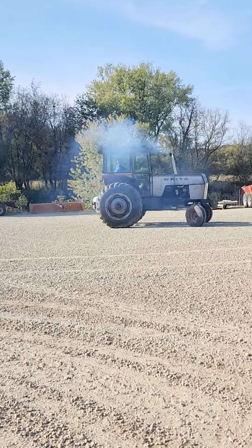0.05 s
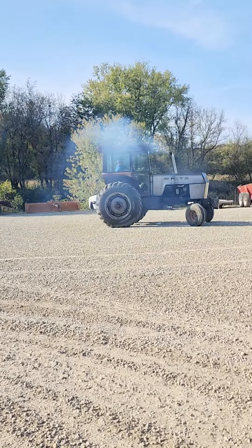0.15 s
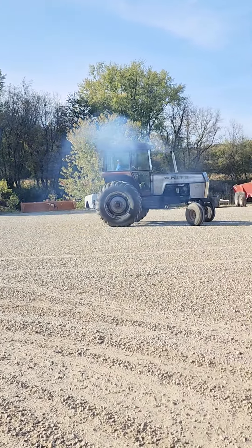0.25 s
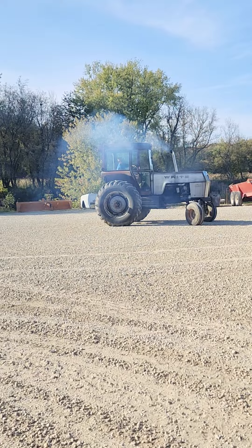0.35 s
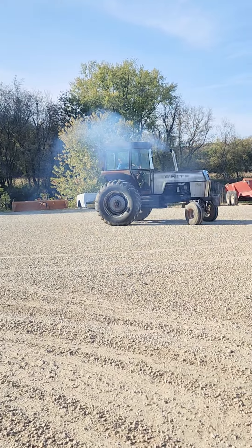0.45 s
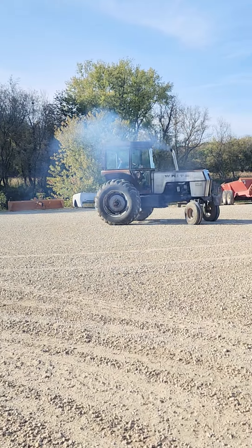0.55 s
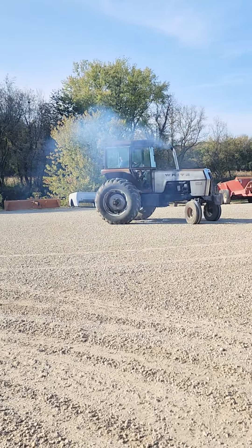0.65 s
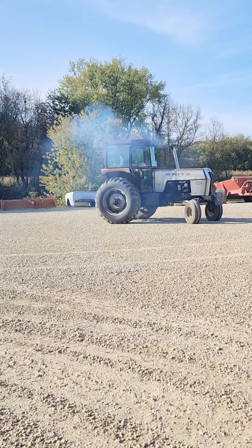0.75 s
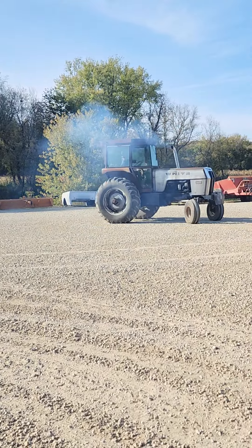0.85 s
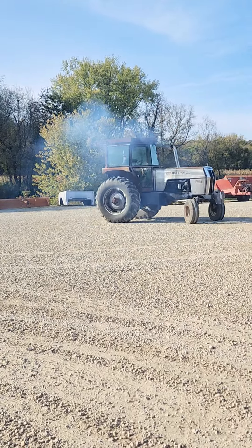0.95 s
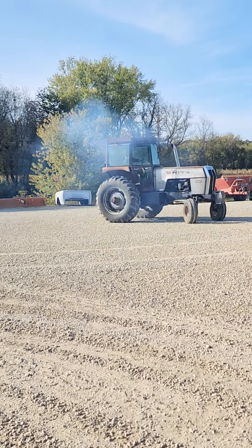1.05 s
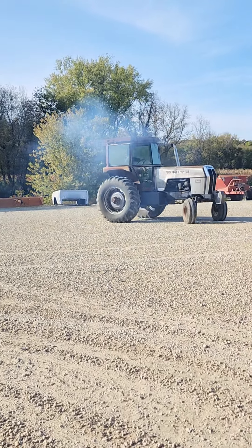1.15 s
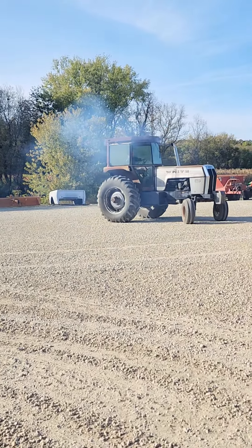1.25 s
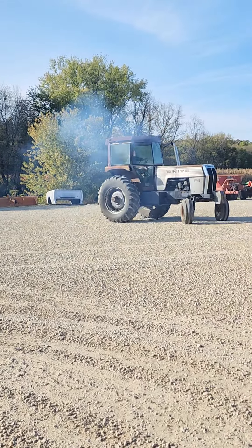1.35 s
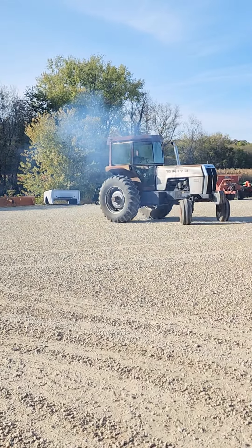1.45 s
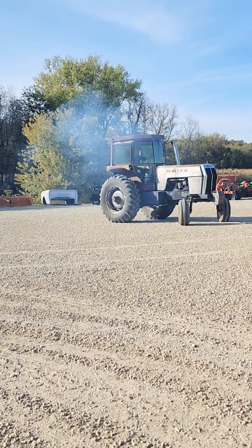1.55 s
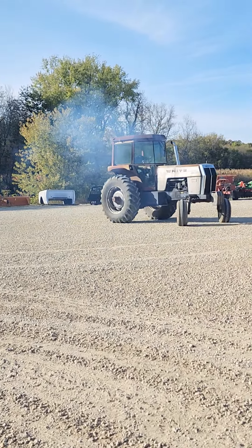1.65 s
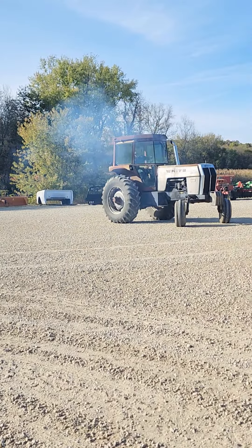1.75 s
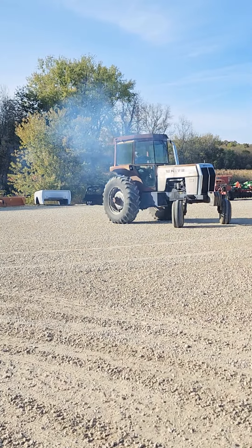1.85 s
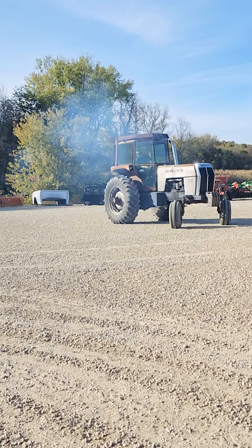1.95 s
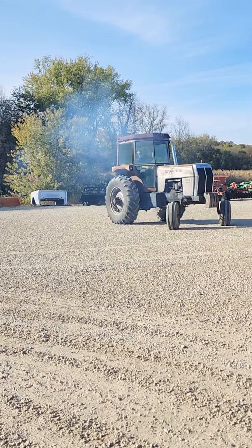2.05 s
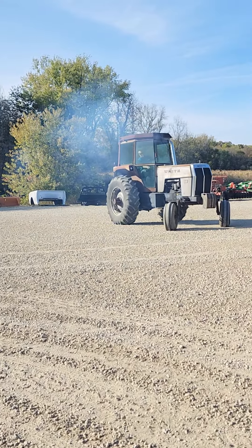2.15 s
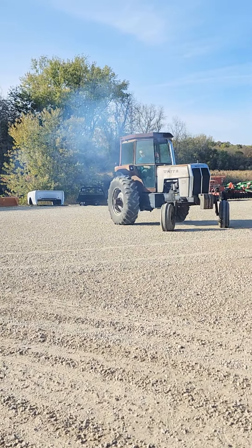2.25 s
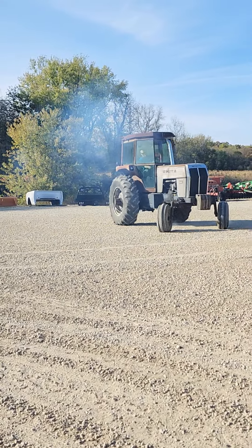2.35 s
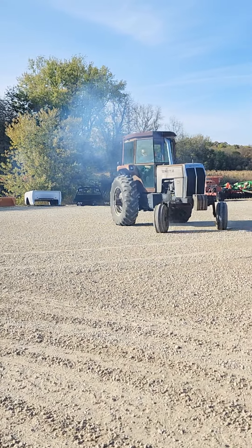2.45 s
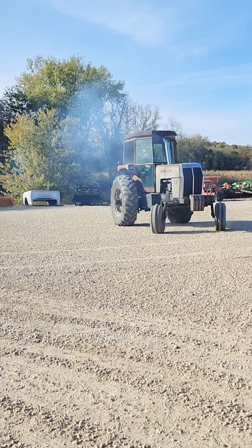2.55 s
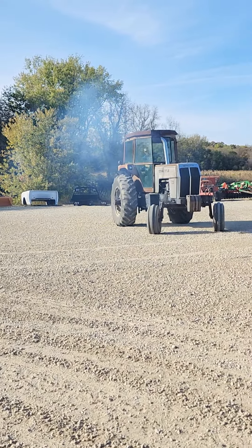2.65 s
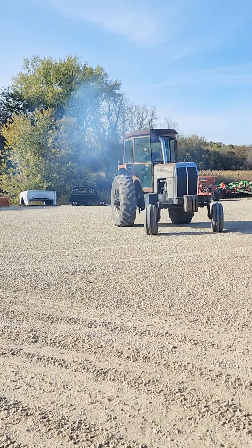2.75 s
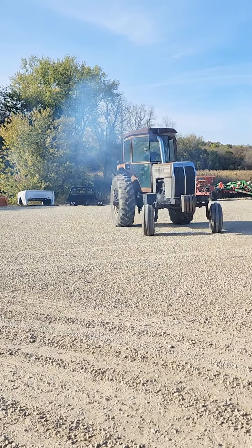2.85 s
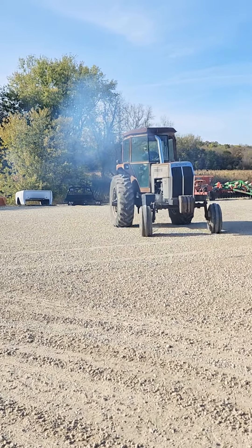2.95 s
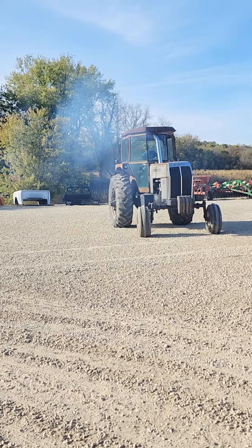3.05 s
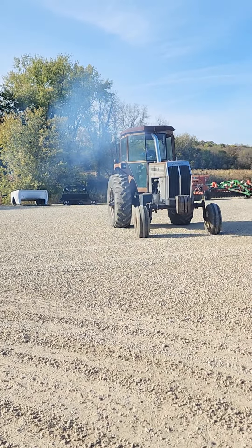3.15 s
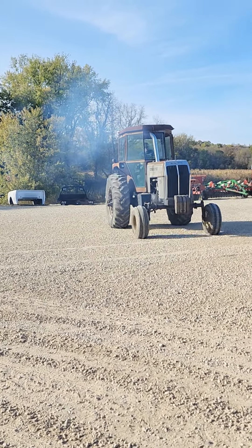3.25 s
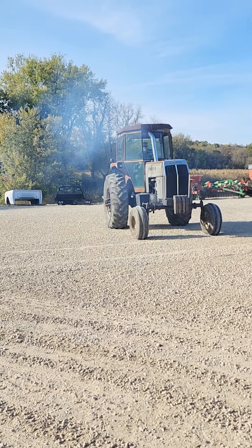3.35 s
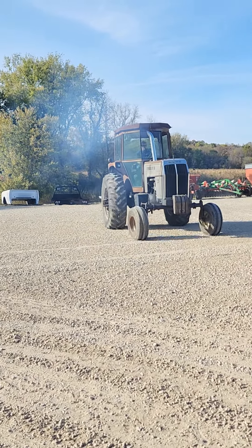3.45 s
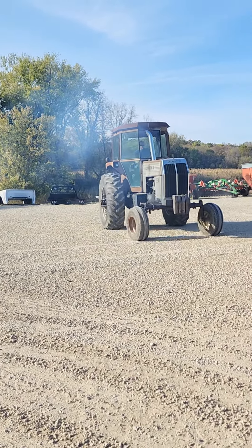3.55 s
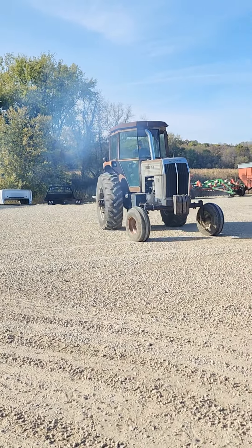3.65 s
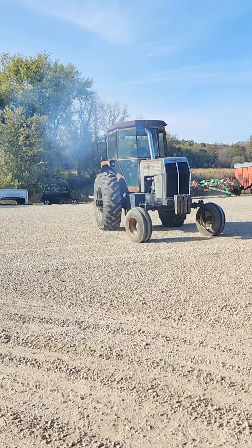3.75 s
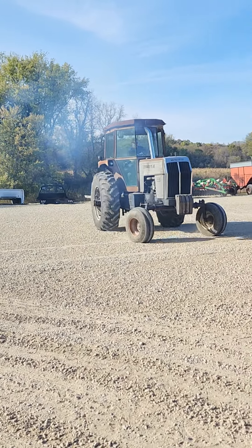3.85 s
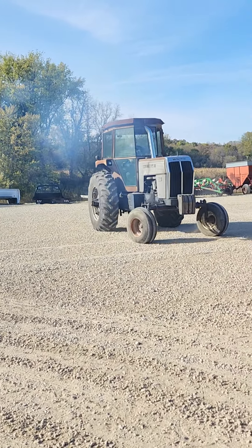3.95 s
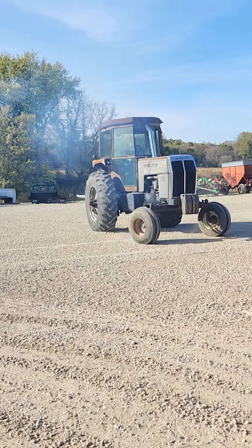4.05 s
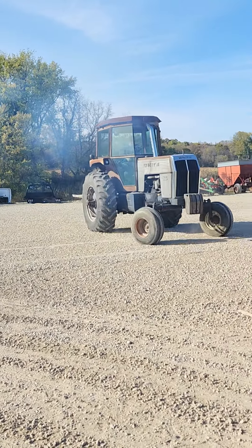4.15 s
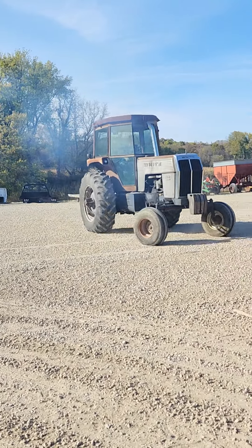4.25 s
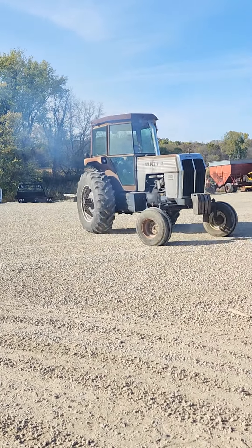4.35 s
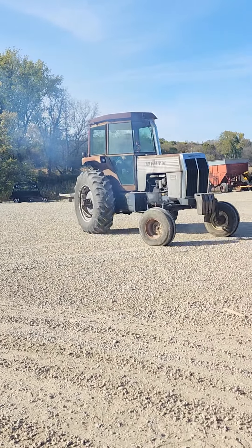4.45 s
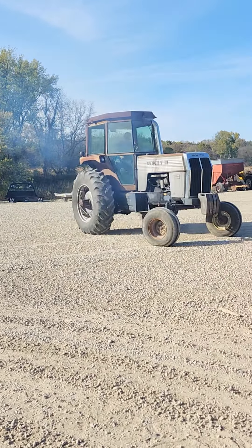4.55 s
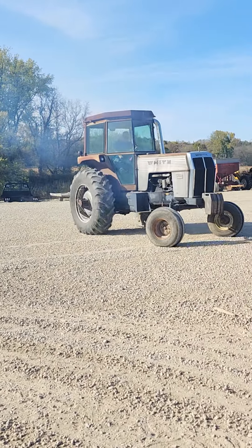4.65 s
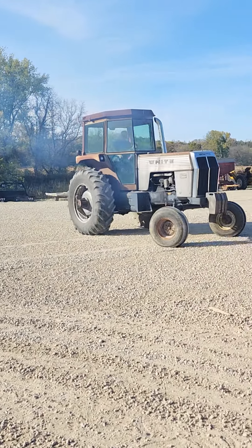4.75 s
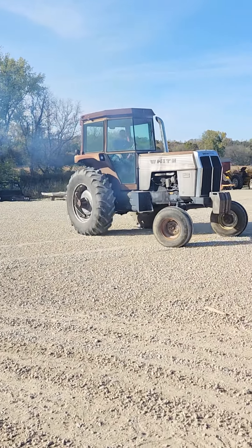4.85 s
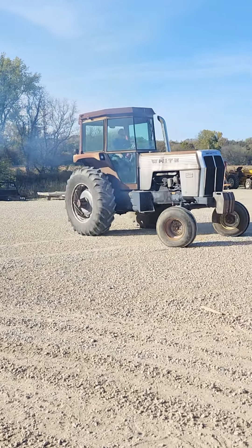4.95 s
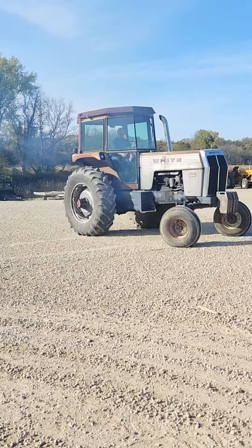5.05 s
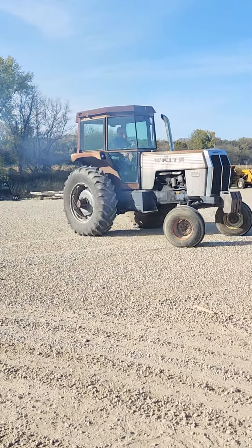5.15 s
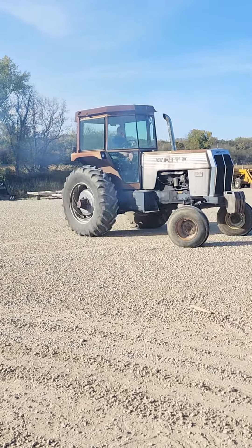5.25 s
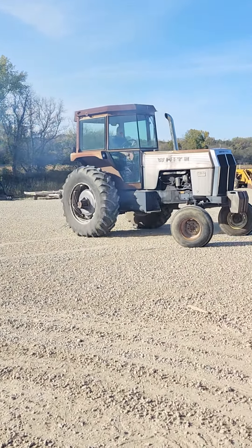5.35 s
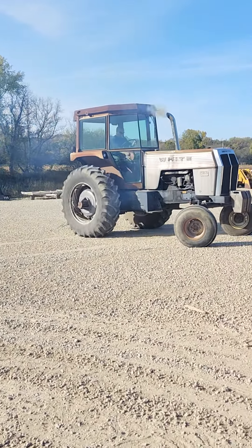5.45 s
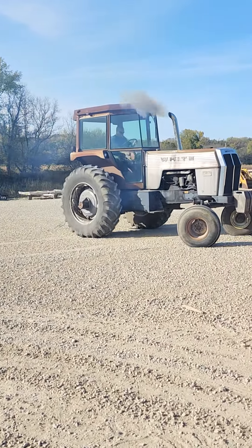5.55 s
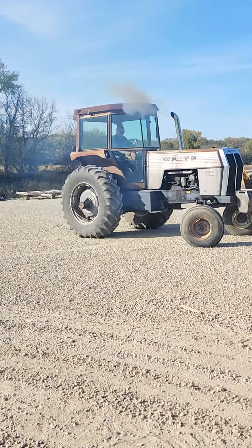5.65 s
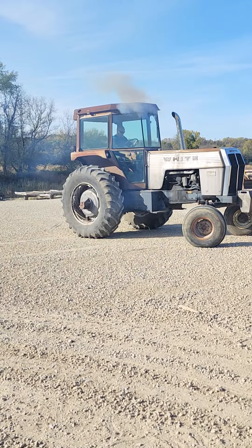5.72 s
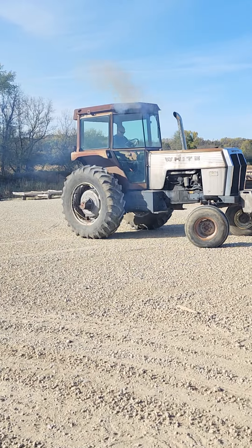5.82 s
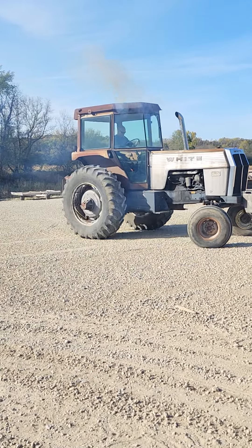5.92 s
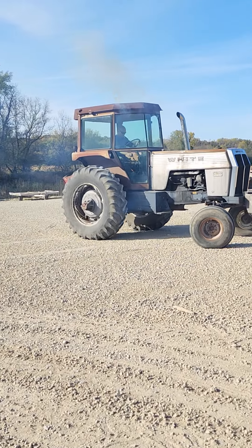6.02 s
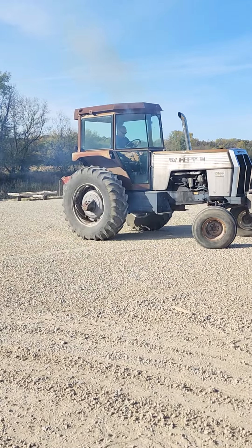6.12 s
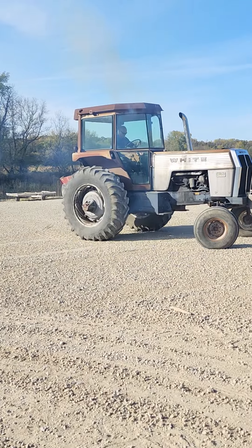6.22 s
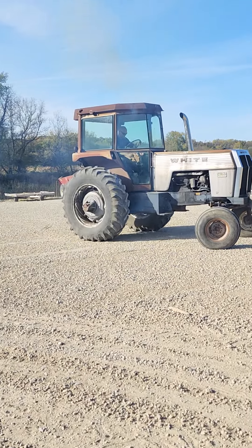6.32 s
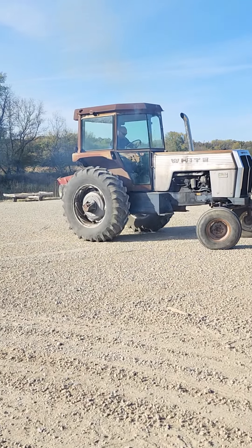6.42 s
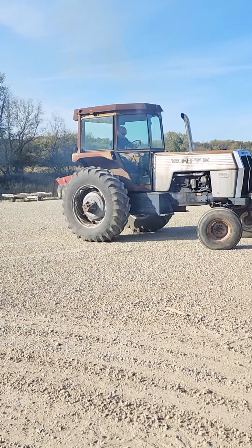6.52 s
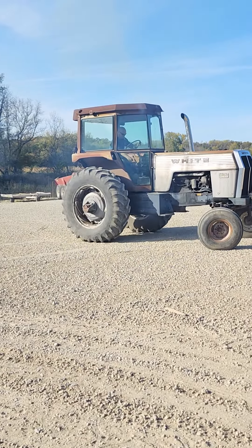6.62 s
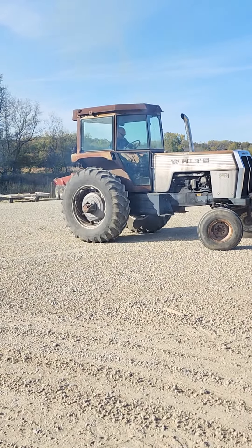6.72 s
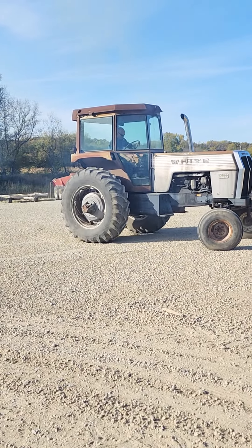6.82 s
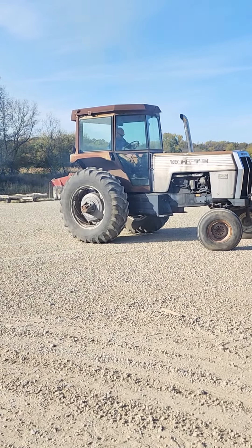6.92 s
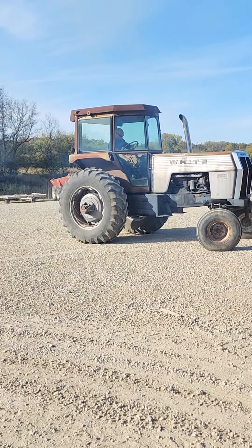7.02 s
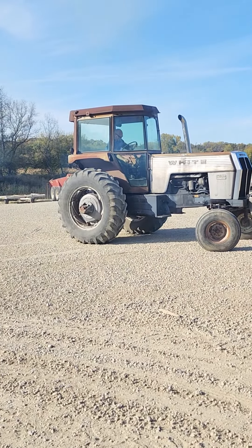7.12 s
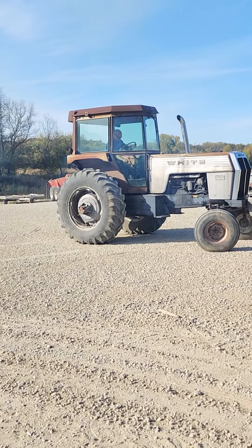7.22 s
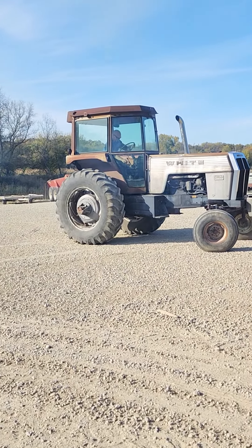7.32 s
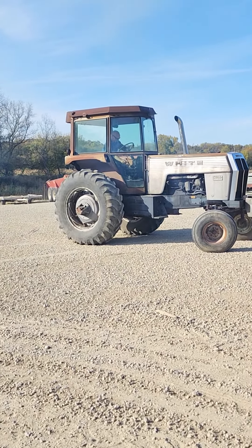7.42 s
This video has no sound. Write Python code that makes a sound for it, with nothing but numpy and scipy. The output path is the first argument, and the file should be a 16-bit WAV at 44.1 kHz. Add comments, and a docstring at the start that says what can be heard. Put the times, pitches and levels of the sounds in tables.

```python
"""A gravel yard: a six-cylinder turbo-diesel tractor drives up, blips its throttle and drops to idle.
The exhaust stack booms at the firing rate, the block clatters, and a leak hisses and spits hard,
mostly an engine cycle apart. The turbocharger rushes with the blip, then whistles down as the engine
slows and the unloaded gears rattle. Underneath, stones crack below the tyres."""
import sys
import numpy as np
from scipy import signal
from scipy.fft import rfft, irfft
from scipy.io import wavfile

SR = 44100
rng = np.random.default_rng(int(sys.argv[2]) if len(sys.argv) > 2 else 0)


def materialize(psi):
    """Save the field psi as 16-bit PCM at rate SR to the path in sys.argv[1].

    A 1-D psi becomes a single channel; in a 2-D psi each row is a channel.
    """
    bounded = np.clip(np.atleast_2d(psi).T, -1, 1)
    quanta = np.round(bounded * 32767).astype(np.int16)
    wavfile.write(sys.argv[1], SR, quanta)


N = 329868
TIME = np.arange(N) / SR
BINS = np.fft.rfftfreq(N, 1 / SR)

# Engine speed. Each row: time in seconds, firings per second.
FIRING_RATE = [(0, 82.2), (2.6, 82.22), (3.1, 82.98), (4.25, 83.03), (4.55, 84.45), (5.38, 84.6),
               (5.55, 97.5), (5.69, 99), (6.38, 65.4), (6.97, 49.5), (7.48, 49.3)]
# Cylinder accents in firing order. Each row: knock in dB, leak in dB.
CYLINDERS = [(4, 5.5), (0.5, 7.5), (1, -4), (-1.5, -2.5), (-1.5, 5), (-4.5, 3.5)]
KNOCK_ACCENTS_DB, LEAK_ACCENTS_DB = np.transpose(CYLINDERS)
# EQ of escaping gas. Each row: frequency in Hz, then gain in dB when far, near and coasting.
HISS_EQ = [(2280, -26, -13, -30), (3175, 17.5, 15, 19.5), (3580, 16.5, 18.5, 19.5), (4110, 22, 18, 19),
           (5580, 19.5, 18, 20.5), (5380, 17, 19.5, 18.5), (6900, 13.5, 12.5, 13.5), (8340, 13.5, 13, 15),
           (9800, 12, 7.5, 11.5), (11900, 7.5, 9, 12), (12600, 8, 8.5, 10), (15400, 14, 10.5, 11.5)]

# Cues, each a start and a length in seconds.
PULL = (0.2, 0.3)  # the engine takes up the load
APPROACH = (0.51, 1.43)  # the tractor swings round and draws near
EASE = (4.15, 0.43)  # the load lightens
COAST = (5.32, 0.47)  # the throttle closes
FUEL_CUT = (5.688, 0.04)
IDLE = (6.98, 0.15)  # the governor catches the engine


def amp(db):
    """Decibels to gain."""
    return 10 ** (np.asarray(db) / 20)


def unit(x):
    """Scales to an rms of 1."""
    return x / np.sqrt(np.mean(x ** 2) + 1e-20)


def add(mix, s, sound):
    """Mixes a sound in at s seconds."""
    part = mix[..., round(s * SR):][..., :sound.shape[-1]]
    part += sound[..., :part.shape[-1]]


def curves(rows):
    """The columns of a time table, one value a sample."""
    s, *columns = np.transpose(rows)
    return [np.interp(TIME, s, c) for c in columns]


def spectra(rows):
    """The columns of a frequency table, one value a bin."""
    hz, *columns = np.transpose(rows)
    return [np.interp(np.log(BINS + 1), np.log(hz), c) for c in columns]


def shaped(x, db):
    """Filters by a gain in dB for each bin."""
    return irfft(rfft(x) * amp(db), N)


def drift(hz):
    """Random modulation of rms 1, up to about hz."""
    step = 1 if hz > 60 else 44
    t = TIME[::step]
    rolloff = 1 + (np.fft.rfftfreq(len(t), step / SR) / hz) ** 4
    slow = irfft(rfft(rng.standard_normal(len(t))) / rolloff, len(t))
    return np.interp(TIME, t, unit(slow))


def ramp(start, length):
    """Goes from 0 to 1 in a straight line."""
    return np.clip((TIME - start) / length, 0, 1)


def blip(start=5.398, attack=0.014, hold=0.078, release=0.115):
    """Envelope of the throttle stab, 0-1; times in seconds."""
    return ramp(start, attack) - ramp(start + attack + hold, release)


def level(db, nose_db=0, ease_db=0, blip_db=0, coast_db=0, slow_db=0):
    """Fader in dB: up with nearness, offset nose-on, at each cue and per halving of engine speed."""
    # Each row: time in seconds, distance in metres, how squarely the nose faces the listener (0-1).
    path = [(0, 20, 0), (1.6, 20, .2), (2.9, 19, 1), (3.9, 17.7, .75), (4.6, 15.4, .2), (5.4, 14.3, 0),
            (7.48, 13.6, 0)]
    metres, nose = curves(path)
    halvings = np.maximum(np.log2(FIRING_RATE[0][1] / curves(FIRING_RATE)[0]), 0)
    place_db = 20 * np.log10(path[0][1] / metres) + nose_db * nose
    cue_db = ease_db * ramp(*EASE) + blip_db * blip() + coast_db * ramp(*COAST)
    return db + place_db + cue_db + slow_db * halvings


def strokes(cycle, accents_db, lag, decay, between):
    """Envelope with a quick rise and slower fall at each firing; lag and decay are shares of a firing."""
    firing = len(CYLINDERS) * (cycle + 1) - lag
    index, age = firing.astype(int), firing % 1 / decay
    size = amp(accents_db[index % len(CYLINDERS)] + rng.uniform(-3, 3, N)[index])
    return unit(np.hypot(between, size * age * np.exp(1 - age)))


def crank_tone(cycle, order, db, waver_db, wander_rad):
    """A tone at a whole multiple of the engine cycle rate, wavering in level and phase."""
    gain = np.sqrt(2) * amp(db + waver_db * drift(8.1))
    return gain * np.cos(2 * np.pi * (round(order) * cycle + rng.random()) + wander_rad * drift(5.5))


def air_band(phase, spread_hz=370):
    """A band of rushing air either side of a tone's phase."""
    return drift(spread_hz) * np.cos(phase) + drift(spread_hz) * np.sin(phase)


def radiate(x, eq):
    """The engine's colour and ringing panels crossfade as it draws near and as the load comes off."""
    # Each row: frequency in Hz, width in Hz, then gain in dB when far, near and coasting.
    panels = [(303.6, 9, 13.5, 8.5, 3), (584, 17, 6.5, 2.2, 6.6), (663, 45, 5.5, 2.7, 1),
              (923, 52, 5.5, 2.3, 2.4), (1024, 30, 7.5, 2.3, 8.1), (1376, 70, 4, 1, 3.5),
              (1587, 86, 6, 5.8, 2), (2101, 60, 9, 4.7, 4.8), (3955, 39, -6, 3.9, 5.2),
              (4330, 37, 4.5, 2.6, 4.8), (4830, 79, 0.5, 4.1, 1.3)]
    ringing_db = sum(np.outer(dbs, 1 / (1 + (2 * (BINS - hz) / width) ** 2))
                     for hz, width, *dbs in panels)
    near, coast = ramp(*APPROACH), ramp(*COAST)
    shares = (1 - coast) * (1 - near), (1 - coast) * near, coast
    return sum(share * shaped(x, eq_db + ring_db - 7)
               for share, eq_db, ring_db in zip(shares, spectra(eq), ringing_db))


def bump(at_s=0.42, width_s=0.0037):
    """One soft low thump at the microphone."""
    offset = (TIME - at_s) / width_s
    return amp(-14) * (1 - offset ** 2) * np.exp(-offset ** 2 / 2)


def gravel(cracks_per_s=480, spread_db=4, clump_db=2):
    """Small stones crack in clumps under the tyre lugs, loudest as the tyres scrub through the turn."""
    sizes = amp(spread_db * np.minimum(rng.exponential(1, (2, N)), 4) + clump_db * drift(10))
    cracks = sizes * rng.choice([-1, 1], (2, N)) * (rng.random((2, N)) < cracks_per_s / SR)
    stone_db = spectra([(1500, -24), (3500, -5), (4600, -5), (7500, 3), (9800, -7), (12000, -2),
                        (15500, -6)])[0]
    scrub_db = 8 * np.exp(-((TIME - 1.54) / 0.92) ** 2)
    gain = amp(level(-46, nose_db=-9.5, coast_db=-16, slow_db=9) + scrub_db)
    return gain * unit(shaped(cracks, stone_db))


def fan(centre_hz=310, width_hz=100):
    """A low roar, likely the cooling fan, strongest while the nose points at the listener."""
    band_db = -10 * np.log10(1 + (2 * (BINS - centre_hz) / width_hz) ** 6)
    roar = unit(shaped(rng.standard_normal((2, N)), band_db))
    return amp(level(-40.5, nose_db=8.5, ease_db=-27, coast_db=-9)) * roar


def groan(cycle, peak_s=6.69, width_s=0.088, order=39):
    """A short falling groan, likely from the drive line, as the engine slows."""
    return amp(-35) * np.exp(-((TIME - peak_s) / width_s) ** 2) * np.cos(2 * np.pi * order * cycle)


def drones(cycle):
    """Crankshaft tones swell and fade as one side of the engine after another faces the listener."""
    # Each row: multiple of the cycle rate (rounded), peak time and half-length in seconds, level in dB.
    swells = [(68.2, 0.55, .55, -37.5), (51, 0.77, .4, -37), (45, 0.97, 0.51, -36), (51, 1.86, 0.34, -37),
              (49, 3, 1.1, -39), (22, 2.7, .8, -36), (84.4, 2.1, 0.65, -39.5), (24, 3.73, 1.4, -33.5),
              (48, 3.3, 0.82, -31.5), (47, 4, 0.82, -36.5), (81.4, 3.63, 0.85, -36),
              (112.7, 4.15, 0.44, -40), (39, 4.67, .35, -33.5)]
    return sum(np.exp(-((TIME - s) / half) ** 2) * crank_tone(cycle, k, db, waver_db=3, wander_rad=0.43)
               for k, s, half, db in swells)


def gear_rattle(cycle):
    """With the load off, gear teeth slap at each firing and ring the castings."""
    # Each row: frequency in Hz, width in Hz, relative level in dB.
    modes = [(1405, 18, 10.5), (1508, 30, 9), (1628, 29, -1), (2046, 40, 3), (3830, 180, -7.5),
             (4480, 120, -1), (4930, 130, 7)]
    castings = sum(amp(db) / (1 + 2j * (BINS - hz) / width) for hz, width, db in modes)
    slaps = strokes(cycle, KNOCK_ACCENTS_DB, lag=0.27, decay=0.16, between=0.2)
    rung = irfft(rfft(slaps * rng.standard_normal((2, N))) * castings, N)
    return amp(level(-52, ease_db=15, blip_db=-19, coast_db=2, slow_db=-15)) * unit(rung)


def gear_knocks(rise_s=0.0019):
    """Backlash in the unloaded gears: each hard knock rings a casting for a few milliseconds."""
    # Each row: start in seconds, pitch in Hz, peak level in dB.
    hits = [(5.786, 1010, -19), (5.859, 1520, -21), (5.872, 1500, -24), (5.92, 1610, -26),
            (5.964, 1440, -19), (5.977, 1410, -20), (6.023, 980, -22), (6.051, 1580, -17.5),
            (6.075, 1580, -18.5), (6.127, 1560, -22), (6.166, 1420, -24), (6.233, 1590, -28),
            (6.259, 1550, -23), (6.275, 1520, -21), (6.291, 1530, -22), (6.303, 1490, -25),
            (6.3764, 1557, -23), (6.389, 1520, -29), (6.457, 1410, -26), (6.473, 1480, -25),
            (6.801, 1410, -30), (6.858, 1550, -25)]
    out, age = np.zeros(N), np.arange(SR // 30) / SR
    envelope = age / rise_s * np.exp(1 - age / rise_s)
    for start, hz, db in hits:
        add(out, start, amp(db) * envelope * np.sin(2 * np.pi * (hz * age + rng.random())))
    return out


def gust(rasp_db=1.5):
    """The blip forces a short, rasping blast of air through the turbocharger."""
    # Each row: frequency in Hz, relative gain in dB.
    eq = [(600, -27), (1000, 1), (2400, 0.5), (3350, -9), (4300, 0), (5000, 14), (6200, 2), (7200, -4.5),
          (9500, -4.5), (12000, -8), (15500, -6)]
    air = rng.standard_normal((2, N)) * amp(rasp_db * drift(250))
    return amp(-16.5) * blip() * unit(shaped(air, spectra(eq)[0]))


def turbo(cycle, loaded_jitter=0.0125, coasting_jitter=0.009, blip_jitter=0.004, fuzz=0.45):
    """A fuzzy blade tone, purer when coasting, inside bands of rushing air that pulse with the engine."""
    # Each row: time in seconds, blade pitch in Hz.
    blade_pitch = [(0, 5800), (1.3, 5780), (2.7, 5860), (4.3, 5780), (4.7, 5560), (5.39, 5230),
                   (5.56, 6560), (5.72, 6400), (6.2, 5790), (6.65, 4990), (6.95, 4400), (7.19, 4020),
                   (7.48, 3700)]
    # Each row: time in seconds, whistle level in dB.
    whistle_fader = [(0, -50), (1.0, -48), (1.35, -41.5), (2.5, -45), (4.2, -43.5), (4.7, -41), (5.3, -36),
                     (5.38, -39), (5.42, -25.5), (5.54, -28), (5.59, -41), (5.64, -42), (5.74, -38),
                     (5.85, -40), (6.08, -34), (6.3, -37), (6.46, -36.5), (6.53, -41), (6.6, -35),
                     (6.75, -33), (6.87, -39), (6.96, -35.5), (7.1, -44), (7.24, -37), (7.38, -40),
                     (7.48, -48)]
    # Swells of air. Each row: peak time, rise and fall in seconds, centre in Hz, peak level in dB.
    swells = [(.73, 0.14, 0.13, 4590, -27), (5.31, 0.11, 0.082, 5250, -25.5)]
    hz, whistle_db = curves(blade_pitch)[0], curves(whistle_fader)[0]
    jitter = loaded_jitter + (coasting_jitter - loaded_jitter) * ramp(*COAST) + blip_jitter * blip()
    phase = 2 * np.pi * np.cumsum(hz * (1 + jitter * drift(106.4))) / SR
    rush_db = level(-50, nose_db=-3.5, ease_db=3, blip_db=17, coast_db=-3, slow_db=-6)
    rush_db += 4 * ramp(*APPROACH) * (1 - ramp(*EASE))
    pulsing = strokes(cycle, KNOCK_ACCENTS_DB, lag=0.076, decay=0.18, between=0.42)
    octave_db = np.interp(hz, [5400, 5950, 6250], [-45, -25, -19])  # heard only near top speed
    blades = np.cos(phase) + amp(octave_db) * np.cos(2 * phase)
    pair = []
    for _ in range(2):
        whistle = unit(amp(3 * drift(22)) * (blades + fuzz * air_band(phase, spread_hz=130)))
        rush = amp(rush_db) * air_band(phase, spread_hz=260)
        for s, rise, fall, centre_hz, db in swells:
            swell = np.exp(-np.maximum((s - TIME) / rise, (TIME - s) / fall))
            rush += amp(db) * swell * air_band(2 * np.pi * centre_hz * TIME)
        pair.append(amp(whistle_db) * whistle + rush * pulsing)
    return np.array(pair)


def leak_hiss(cycle, loaded_depth=0.68, eased_depth=0.41):
    """Gas hisses out at each firing, harder from some cylinders; it pulses deepest under load."""
    puffs = strokes(cycle, LEAK_ACCENTS_DB, lag=0.011, decay=0.32, between=0.68)
    depth = loaded_depth + (eased_depth - loaded_depth) * ramp(*EASE)
    level_db = level(-45, nose_db=-5, ease_db=-3.5, coast_db=-2.5, slow_db=-13) + 1.5 * ramp(*PULL)
    flow = amp(level_db) * (1 - depth + depth * puffs)
    return radiate(flow * rng.standard_normal((2, N)), HISS_EQ)


def leak_spits(rise_s=0.0012, fall_s=0.0055, tail_s=0.02, manifold_hz=(4750, 5750), width_hz=230):
    """The leak spits hard, then weaker a firing later; each spit rings the manifold slightly detuned."""
    # Each row: start in seconds, level in dB before the EQ.
    spits = [(0.0737, -15), (0.2199, -26), (0.269, -22), (0.293, -15), (0.375, -14), (0.4244, -14),
             (0.4873, -15), (0.5695, -15), (0.633, -11), (0.643, -18), (0.7063, -18), (0.7158, -17),
             (0.781, -13), (0.79, -20), (0.851, -18), (0.9737, -14), (0.999, -13), (1.144, -10),
             (1.216, -11.5), (1.29, -19), (1.3628, -10.5), (1.4414, -19), (1.511, -10), (1.583, -13.5),
             (1.654, -15), (1.7064, -16), (1.7294, -16), (1.8497, -20), (2.0188, -18), (2.091, -13.5),
             (2.167, -21), (2.2397, -19), (2.3131, -23), (2.386, -19), (2.5321, -19), (2.6783, -17),
             (2.8225, -14), (3.1944, -20), (3.2575, -31), (3.4017, -24), (3.473, -16), (3.6187, -27),
             (3.692, -27), (3.7643, -21), (3.836, -16.5), (3.908, -23), (3.98, -16.5), (4.345, -18),
             (4.695, -18), (4.768, -26)]
    out, age = np.zeros((2, N)), np.arange(SR // 8) / SR
    late = np.maximum(age - 1 / FIRING_RATE[0][1], 0)
    crack, again = (np.minimum(a / rise_s, np.exp((rise_s - a) / fall_s)) for a in (age, late))
    tail = amp(-10) * np.exp(-age / tail_s)
    for start, db in spits:
        second = amp(-7 + 2.2 * rng.standard_normal()) * again
        envelope = np.sqrt(crack ** 2 + second ** 2 + tail ** 2)
        air = amp(db) * envelope * rng.standard_normal((2, len(age)))
        pitches = np.array(manifold_hz) * (1 + 0.035 * rng.uniform(-0.81, 1, 2))
        ring = sum(signal.lfilter(*signal.iirpeak(hz, hz / width_hz, SR), air) for hz in pitches)
        add(out, start, air + amp(2) * ring)
    eq_db = spectra([(3000, -27), (5000, -10.5), (6200, -13), (8000, -18.5), (13000, -21.5)])[0]
    return shaped(out, eq_db)


def block_clatter(cycle, repeat_share=0.25, points=1500):
    """Each firing knocks the block; part of the rattle repeats with every engine cycle, part is new."""
    # Each row: frequency in Hz, then gain in dB when far, near and coasting.
    block_eq = [(170, -35, 9, -21), (304, 12.5, 18, 11.5), (345, 17, 17, 13), (606, 13.5, 16.5, 16.5),
                (650, 15.5, 18, 14), (770, 21, 17.5, 15), (1187, 9.5, 15, 10.5), (1160, 8, 10.5, -5),
                (1543, 15, 12.5, 15.5), (1914, 9, 5, -4.5), (1830, 5, 13, 12), (2390, 14.5, 5.5, 0.5),
                (3035, 3.5, 1.5, 3), (4430, -32, -37, -51)]
    loops = rng.standard_normal((2, points))
    locked = np.array([np.interp(cycle * points, np.arange(points), p, period=points) for p in loops])
    locked /= np.sqrt(SR / (points * np.gradient(cycle)))  # same power per Hz at any speed
    noise = np.sqrt(repeat_share) * locked + np.sqrt(1 - repeat_share) * rng.standard_normal((2, N))
    blows = strokes(cycle, KNOCK_ACCENTS_DB, lag=0.0083, decay=0.18, between=1)
    level_db = level(-21, nose_db=-0.2, blip_db=2.5, coast_db=-3.5, slow_db=-6.5)
    return amp(level_db + 0.5 * drift(3.8)) * radiate(noise * blows, block_eq)


def stack_rumble(cycle):
    """Gas tumbling in the stack makes a low bed of noise, puffing unevenly once the fuel is cut."""
    # Each row: frequency in Hz, relative gain in dB.
    eq = [(20, -26), (38, -12), (58, -9.5), (110, 0.5), (210, -4.5), (280, -5.5), (380, -26), (700, -53)]
    noise = unit(shaped(rng.standard_normal((2, N)), spectra(eq)[0]))
    puffs = strokes(cycle, LEAK_ACCENTS_DB, lag=0.093, decay=0.28, between=0.27)
    depth = 0.27 * ramp(*FUEL_CUT)
    level_db = level(-29, nose_db=1, ease_db=0.5, blip_db=-1, coast_db=-4, slow_db=-4.5)
    return amp(level_db) * noise * (1 - depth + depth * puffs)


def stack_chugs(rise_s=0.0039):
    """A few heavy chugs burst from the stack as the engine runs down."""
    # Each row: start in seconds, pitch in Hz, peak level in dB.
    chugs = [(5.822, 137, -19), (5.866, 135, -16), (6.028, 122, -18), (6.97, 109, -23)]
    out, age = np.zeros(N), np.arange(SR // 8) / SR
    envelope = age / rise_s * np.exp(1 - age / rise_s)
    for start, hz, db in chugs:
        add(out, start, amp(db) * envelope * np.sin(2 * np.pi * hz * age))
    return out


def stack_boost(multiple, centre_hz=128, width_hz=52, peak_db=10.5):
    """Gain in dB of a multiple of the firing rate as it sweeps through the stack's resonance."""
    return peak_db / (1 + (2 * (multiple * curves(FIRING_RATE)[0] - centre_hz) / width_hz) ** 2)


def exhaust(cycle):
    """Firing pulses boom from the stack; under load a close tone, likely the fan, beats on the throb."""
    # Weak tones from unequal cylinders. Each row: multiple of the cycle rate, dB loaded, dB coasting.
    uneven_orders = [(4, -41, -46), (5, -49, -51), (7, -37.5, -45.5), (8, -38, -37), (10, -89, -40),
                     (11, -33, -44), (13, -38.5, -50), (14, -34.5, -43), (15, -32.5, -37.5), (16, -44, -40),
                     (18, -39.5, -43.5), (22, -47, -43), (23, -47, -58)]
    # Octave of the firing rate under load. Each row: time in seconds, level in dB.
    buzz_fader = [(0, -18), (1.2, -18.5), (1.5, -20), (1.95, -20), (2.7, -17.5), (3.7, -16), (4.3, -17.5),
                  (4.55, -24), (5.35, -29.5)]
    load, cut, idle = 1 - ramp(*COAST), ramp(*FUEL_CUT), ramp(*IDLE)
    phase = 2 * np.pi * len(CYLINDERS) * (cycle + 0.0008 * drift(14))
    boom_db = level(-13.5, nose_db=-2.5, ease_db=-1, coast_db=-2.5, slow_db=-19) - 14 * cut + 14 * idle
    boom = amp(boom_db + 0.7 * drift(6)) * np.cos(phase)

    coasting_db = level(-26, blip_db=7, slow_db=-4.5) - 10 * cut + stack_boost(2)
    octave_db = load * curves(buzz_fader)[0] + (1 - load) * coasting_db
    # the octave's lag steepens each pulse, and shrinks as the nose comes round
    lag_rad = np.interp(TIME, [0, 2.6, 4.3], [2.3, 0.7, 1])
    octave = amp(octave_db + (0.6 + 2.2 * cut) * drift(16)) * np.cos(2 * phase - lag_rad)
    idle_edge = amp(-33.5) * idle * np.cos(3 * phase - np.pi / 2)  # slow firings are sharper
    uneven = sum(crank_tone(cycle, k, load * on_db + (1 - load) * off_db, waver_db=3.2, wander_rad=0.53)
                 for k, on_db, off_db in uneven_orders)

    throb_db = level(-22.5, nose_db=-5, ease_db=-4.5, blip_db=-14, coast_db=-1, slow_db=-30)
    throb_db += cut * (stack_boost(1.5) - 8.5 + 2.3 * drift(16))
    throb = amp(throb_db) * (np.sin(1.5 * phase) + 0.45 * load * np.sin(1.548 * phase))
    return amp(-4 * idle) * uneven - np.sqrt(2) * (boom + octave + idle_edge + throb)


def microphone(pair):
    """Two ports share the bass; higher up they differ in phase, level and detail."""
    # Each row: frequency in Hz, likeness of left and right (0-1).
    likeness = [(50, 1), (200, .995), (480, .86), (700, .92), (1250, .66), (2100, .78), (3000, .55),
                (4500, .7), (6000, .7), (9000, .52), (15000, .5)]
    # Each row: frequency in Hz, left minus right in dB.
    balance = [(80, 0.2), (165, -0.5), (290, -2), (420, -1.5), (700, 3.5), (1050, -4.5), (1480, 3),
               (1800, 0), (2450, -3), (3800, 1), (4300, -4), (4900, -7.5), (6000, 1), (8200, 4.5),
               (9800, -1), (15000, 0)]
    # Each row: frequency in Hz, phase lead of the left in radians.
    lead = [(80, 0.15), (165, 0.036), (330, 0.19), (700, 0.33), (1250, 0.58), (1800, 0.7), (2400, 0.62),
            (2900, 3), (4400, 1.73), (5500, 4.66), (6500, 6.6), (8000, 7.63), (9500, 9.55), (15500, 15.7)]
    direct, scattered = rfft(pair)
    same, tilt_db = np.clip(spectra(likeness)[0], 0, 1), spectra(balance)[0]
    right = (same * direct + np.sqrt(1 - same ** 2) * scattered) * np.exp(-1j * spectra(lead)[0])
    gains = amp([tilt_db / 2, -tilt_db / 2])
    gains /= np.sqrt(np.mean(gains ** 2, axis=0))
    return irfft(np.array([direct, right]) * gains, N)


def scene():
    """One crankshaft paces the engine over the gravel; noisy layers come as direct and scattered pairs."""
    cycle = np.cumsum(curves(FIRING_RATE)[0]) / SR / len(CYLINDERS) + 0.34  # counts engine cycles
    metal = block_clatter(cycle) + gear_rattle(cycle)
    roar = stack_rumble(cycle) + fan()
    leak = radiate(leak_hiss(cycle) + leak_spits(), HISS_EQ)  # the hiss takes this EQ twice
    air = turbo(cycle) + gust()
    direct = exhaust(cycle) + stack_chugs() + drones(cycle) + gear_knocks() + groan(cycle) + bump()
    return microphone(metal + roar + leak + air + gravel() + np.array([direct, np.zeros(N)]))


def record(dry):
    """A steep low-pass trims the very top of the treble."""
    lowpass = signal.firwin(511, 15950, window=("kaiser", 9), fs=SR)
    return signal.oaconvolve(dry, lowpass[None], "same")


dry = scene()
out = record(dry)
materialize(out)
```